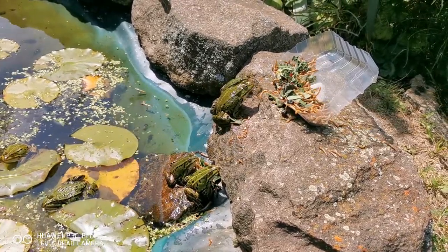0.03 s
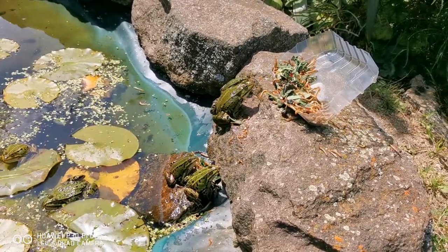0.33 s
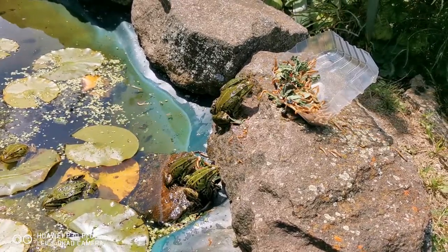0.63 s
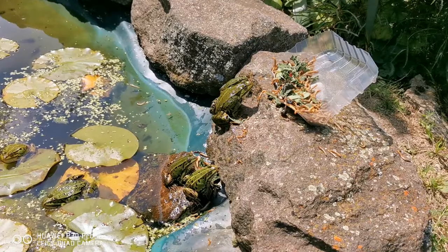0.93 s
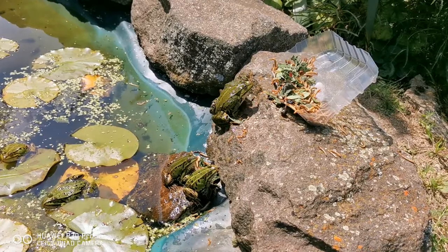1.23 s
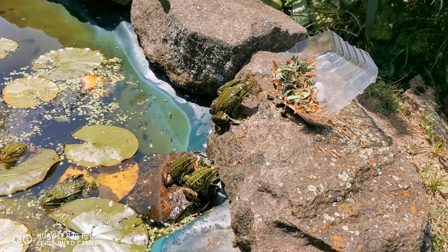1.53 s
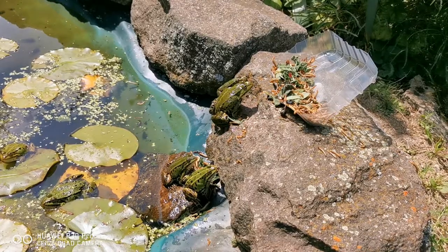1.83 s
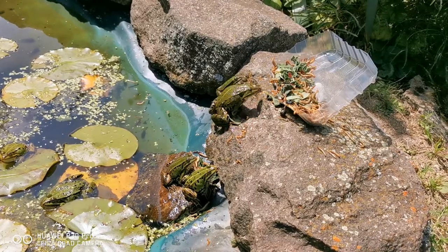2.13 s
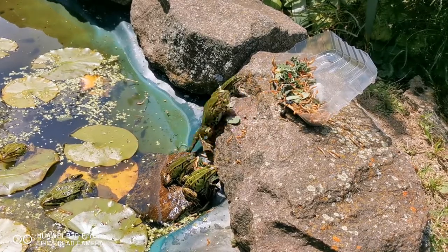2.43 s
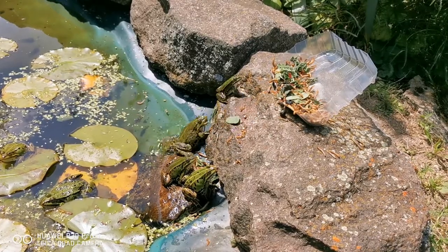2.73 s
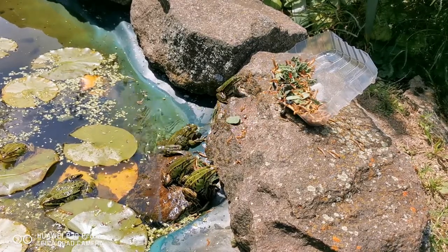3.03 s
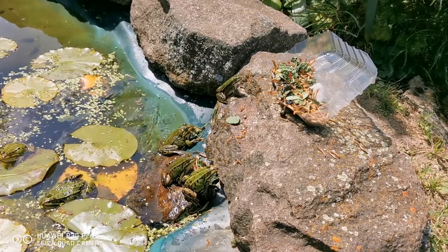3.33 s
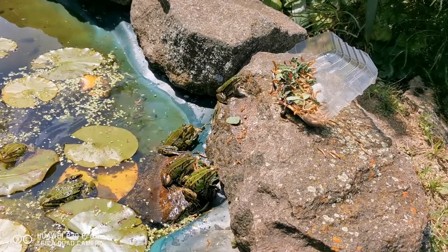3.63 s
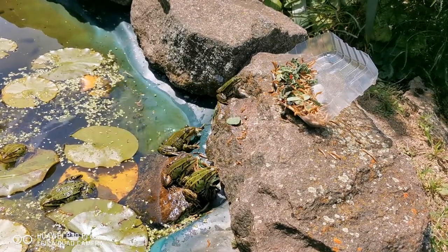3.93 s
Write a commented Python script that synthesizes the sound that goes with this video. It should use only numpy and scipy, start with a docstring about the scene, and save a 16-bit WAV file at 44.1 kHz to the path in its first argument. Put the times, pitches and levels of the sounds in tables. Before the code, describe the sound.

A frog makes a brief, bubbly splash in a garden pond, after a small plip and scattered wet clicks. Heard in stereo, the quiet background holds faint repeated bird chirps and a low hum like a far engine.

```python
"""A garden pond ringed by rocks, heard on a stereo pair. A frog hops off a rock and slips in: a few
wet ticks, then a short splash of fine spray and small ringing bubbles, with a brief echo off the rocks.
Some way off a bird repeats one falling chirp, and farther birds add thin notes. Underneath lie
soft garden air, a faint insect hiss and a low hum, like a far engine, that swells and fades."""
import sys
import numpy as np
from scipy import signal
from scipy.fft import rfft, irfft
from scipy.io import wavfile
from scipy.ndimage import uniform_filter1d, map_coordinates

SR = 44100
rng = np.random.default_rng(int(sys.argv[2]) if len(sys.argv) > 2 else 0)


def unload_audio(sound):
    """Save the sound as a 16-bit wav file, at the path given as the first command line argument."""
    columns = np.transpose(np.atleast_2d(sound))
    # keep every value between -1 and 1, then stretch to whole-number steps
    steps = np.round(np.clip(columns, -1, 1) * 32767)
    wavfile.write(sys.argv[1], SR, steps.astype(np.int16))


N = 176400

# pitch of the far hum (time [s], pitch [Hz])
HUM_PITCH = [(0, 58.6), (.55, 58.8), (1.1, 55.9), (1.35, 58.73), (1.55, 56.5), (2.0, 57.93), (2.3, 57.95),
             (2.6, 56.1), (3.0, 57.86), (4, 57.5)]
# its first three partials and the drone above them (time [s], level [dB])
HUM_FIRST = [(0.0, -58.5), (0.22, -57), (0.29, -67.5), (0.43, -45.5), (0.61, -45), (0.73, -56),
             (0.87, -50.5), (1.29, -51.5), (1.36, -59.5), (1.7, -43.5), (1.82, -52.5), (1.95, -43),
             (2.04, -45.5), (2.08, -56.5), (2.34, -46.5), (2.43, -65), (2.47, -51), (2.58, -44.5),
             (3.07, -48.5), (3.13, -64), (3.4, -56.5), (3.46, -67), (3.55, -58), (3.85, -65), (3.91, -52),
             (4.0, -51)]
HUM_SECOND = [(0.0, -64), (0.27, -65), (0.33, -80), (0.39, -56.5), (0.62, -58), (0.73, -67), (0.81, -56),
              (0.96, -72.5), (0.99, -56), (1.16, -74), (1.27, -54), (1.31, -66), (1.45, -57), (1.56, -70),
              (1.6, -61), (1.89, -59.5), (1.95, -50), (2.14, -75), (2.21, -63.5), (2.51, -59), (2.53, -67),
              (2.67, -54.5), (3.85, -76), (4.0, -62)]
HUM_THIRD = [(0, -72), (.22, -62.5), (.35, -77.5), (1.3, -75), (2.1, -76.5), (3, -78.5), (4, -86)]
HUM_DRONE = [(0, -76), (.85, -77.5), (1.2, -67.5), (1.8, -67.5), (2.0, -91.5), (4, -77)]
# colour of the garden air (frequency [Hz], relative density [dB])
AIR_SPECTRUM = [(15, -26), (25, -7.5), (44, -6.5), (66, -1), (82, -11.5), (102, -7.5), (236, -17.5),
                (384, -27), (575, -23.5), (754, -23.5), (1440, -34.5), (2220, -34), (3520, -40),
                (8830, -51), (9840, -50), (10700, -46.5), (16000, -52)]
# its stereo width (frequency [Hz], side over mid [dB])
AIR_SIDE = [(40, -15), (125, -14), (250, -11), (500, -4.5), (1000, 4), (3000, 0), (12000, 0.5)]
# its balance (frequency [Hz], left over right [dB])
AIR_PAN = [(40, 1.5), (250, -1.5), (500, -6), (1000, -3.5), (4000, -1), (12000, -7.5)]
# slow swells of its lower octaves and of its treble (time [s], gain [dB])
AIR_SWELL = [(0, 0.5), (.6, 0.5), (1.3, 2), (2.0, 1.5), (2.7, -0.5), (3.3, -1.5), (4, -2)]
AIR_TREBLE_SWELL = [(0, -1.5), (1.8, 0.5), (2.4, 2), (3.3, 0.5), (4, 0)]
# insect hiss (time [s], level [dB])
INSECT_LEVEL = [(0, -87), (1.75, -89), (1.95, -82), (2.9, -79.5), (3.55, -79.5), (3.63, -98), (4, -82)]
# its resonances (centre [Hz], width [Hz], relative level [dB])
INSECT_BANDS = [(7180, 1300, -1.5), (7920, 1300, 0.67), (8670, 860, -2.5)]
# the bird some way off
# (time [s], length [s], relative level [dB], pitch [ratio], gain at the end [dB], warble [0-1])
CHIRPS = [(0.025, 0.11, -67, .99, 1.5, 1), (0.661, 0.099, -69, .9, 4.5, 0), (1.245, 0.092, -62, 1.01, 3, 0),
          (1.840, 0.12, -61, 1.0, -1, 1), (2.515, .11, -64, 0.94, -2.5, .3),
          (3.123, 0.099, -71.5, 0.89, 5, 0.16), (3.656, 0.1, -64.5, 1.003, 1.5, .2)]
# course of one chirp (share of length [0-1], stepped pitch [Hz], warbled pitch [Hz], gain [dB])
CHIRP_SHAPE = [(0, 3874, 3764, -8), (.13, 4850, 4573, -2.5), (0.331, 4050, 4740, -0.5),
               (.42, 3870, 3717, 0.5), (.57, 3980, 3658, -5), (0.711, 3010, 4336, 0.5),
               (.87, 2984, 3035, 2), (1, 2630, 2564, -2.5)]
# farther birds (time [s], length [s], relative level [dB], pitch [Hz])
FAR_NOTES = [(1.029, 0.055, -71.5, 4150), (1.96, 0.11, -75, 5200), (2.264, 0.024, -67.5, 2790),
             (2.271, 0.098, -74, 4300), (3.738, 0.088, -77, 9190)]
# wet feet and spray landing (time [s], relative peak [dB], centre [Hz], width [Hz], left over right [dB])
WET_TICKS = [(0.0377, -56, 9000, 9000, 1), (0.112, -60.5, 6000, 6000, -6), (.171, -60, 9000, 9000, -7),
             (.7145, -56, 7990, 8000, -9), (.951, -59, 7020, 5000, 2), (1.0877, -61.5, 8330, 3000, 5),
             (1.108, -63, 9300, 3000, 6), (1.2792, -47.5, 7480, 7080, -8), (2.133, -56.5, 9500, 6000, 4),
             (2.353, -63, 13000, 7000, -10), (2.436, -58, 11500, 5000, -6), (2.5917, -52, 606, 1004, 6),
             (2.591, -49.5, 2200, 2790, -2), (2.8071, -55.5, 1500, 1600, -2), (2.593, -49, 9200, 900, -2),
             (2.593, -48, 13000, 2500, -5), (2.608, -54, 13450, 1503, -6), (2.633, -54.5, 8890, 9000, -10),
             (2.6552, -54, 12000, 8000, -13), (2.660, -55, 12000, 8000, -4), (2.8379, -37, 10940, 2785, -2),
             (2.8573, -41.5, 9800, 4500, -2), (2.9472, -56, 8000, 12000, -1), (2.975, -60, 11490, 4000, 2),
             (3.413, -61.5, 5500, 2502, -4)]
# bubbles and drops at the surface
# (time [s], starting pitch [Hz], relative peak [dB], ring t60 [s], left over right [dB])
BUBBLES = [(.9812, 6860, -62, .008, 4), (0.9979, 2170, -46.5, 0.017, -6), (.9984, 8660, -50.5, 0.0048, 7),
           (0.998, 4740, -54.5, .005, 4), (2.8072, 1556, -56, 0.0045, 5), (2.8205, 5300, -59, 0.0051, -13),
           (2.8374, 9300, -36.5, 0.0055, 5), (2.8382, 7920, -35.5, 0.0038, -13.5),
           (2.8420, 9000, -55, 0.0072, 6), (2.8452, 10700, -49, .005, 0), (2.8480, 3740, -46, .014, 4),
           (2.848, 2870, -45.5, 0.0085, -11), (2.8564, 2352, -41.5, .024, -5),
           (2.8571, 3780, -59, 0.006, 6), (2.8628, 2720, -48, .025, 1), (2.9146, 3000, -53, 0.0077, -5),
           (2.92, 3900, -53, 0.0075, 11), (2.928, 4200, -60, 0.0078, 1), (2.924, 3680, -45, 0.0054, -13),
           (2.9245, 2520, -43, 0.0066, -4), (2.935, 3500, -57, 0.0091, -4), (2.946, 1210, -53, 0.019, 4)]
# fine spray, fizz and scuffing (time [s], length [s], level [dB], centre [Hz], width [Hz])
SPRAY = [(2.335, 0.082, -73.5, 13000, 8000), (2.623, 0.076, -71, 12000, 8000),
         (2.833, 0.019, -66, 9500, 2600), (2.849, 0.02, -59.5, 3120, 1300), (2.862, 0.039, -72, 9400, 4000),
         (2.922, 0.017, -66, 3650, 1500)]


def undb(db):
    """Decibels to gain."""
    return 10 ** (np.asarray(db) / 20)


def unit(x):
    """Scale to rms 1."""
    return x / np.sqrt(np.mean(x ** 2) + 1e-30)


def curve(rows):
    """Join (time [s], value) rows by straight lines."""
    return np.interp(np.arange(N) / SR, *np.array(rows, float).T)


def at_hz(rows, hz):
    """Read (frequency [Hz], value) rows on a log-frequency axis."""
    freqs, values = np.array(rows, float).T
    return np.interp(np.log(np.maximum(hz, 1)), np.log(freqs), values)


def pan(db):
    """Channel gains that put the left db above the right."""
    return undb(np.array([[db], [-db]]) / 2)


def band(x, hz, width):
    """A resonance applied twice, each pass widened so that the pair is about width Hz wide."""
    hz = min(hz, SR * .45)
    b, a = signal.iirpeak(hz, hz / min(width * 1.5, SR * .35), fs=SR)
    return signal.lfilter(b, a, signal.lfilter(b, a, x))


def walk(per_s, size=N):
    """Smooth random wander with spread near 1."""
    hold = max(int(SR / per_s), 1)
    steps = np.repeat(rng.standard_normal(size // hold + 2), hold)
    return np.sqrt(2) * uniform_filter1d(uniform_filter1d(steps, hold), hold)[:size]


def add(out, start, sound):
    """Mix a sound in at its time."""
    i = max(int(start * SR), 0)
    out[..., i:i + sound.shape[-1]] += sound[..., :N - i]


def echo(x, t60):
    """Diffuse reflections, unrelated at the two microphones."""
    t = np.arange(SR // 2) / SR
    tail = rng.standard_normal((2, len(t))) * np.exp(-np.log(1000) * t / t60) * (1 - np.exp(-t / .001))
    tail /= np.sqrt(np.sum(tail ** 2, axis=1, keepdims=True))
    return signal.fftconvolve(x, tail, axes=1)[:, :N]


def far_hum(drone_hz=239.8, waver_db=1.33):
    """A hum like a far engine: three partials swell and waver separately under a faint drone."""
    phase = 2 * np.pi * np.cumsum(curve(HUM_PITCH)) / SR
    drone_phase = 2 * np.pi * drone_hz * np.arange(N) / SR
    first = np.sin(phase + .083 * walk(13)) * undb(curve(HUM_FIRST) + .5 * walk(25))
    second = np.sin(2 * phase + .97 * walk(14)) * undb(curve(HUM_SECOND) + waver_db * walk(16))
    third = np.sin(3 * phase + 1.4 * walk(14)) * undb(curve(HUM_THIRD) + waver_db * walk(15))
    drone = np.sin(drone_phase + .5 * walk(12)) * undb(curve(HUM_DRONE) + waver_db * walk(14))
    return np.sqrt(2) * (first + second + third + drone) * pan(2.1)


def garden_air(base_db=-60.5, treble_from_hz=4500):
    """Soft outdoor noise, wide in the middle and treble, each octave wandering a little."""
    hz = np.arange(N // 2 + 1) * SR / N
    mid, side = rfft(rng.standard_normal((2, N)))
    sign = np.array([[1], [-1]])
    stereo = mid + sign * side * undb(at_hz(AIR_SIDE, hz))
    spectrum = stereo * undb(at_hz(AIR_SPECTRUM, hz) + sign * at_hz(AIR_PAN, hz) / 2)
    octave = np.log2(np.maximum(hz, 20) / 20)
    out = np.zeros((2, N))
    for k in range(11):
        octave_noise = irfft(spectrum * np.maximum(1 - np.abs(octave - k), 0), N)
        swell_db = curve(AIR_TREBLE_SWELL if 20 * 2 ** k > treble_from_hz else AIR_SWELL)
        out += octave_noise * undb(swell_db + walk(9.08))
    return out / np.std(irfft(spectrum, N)) * undb(base_db)


def insect(flicker_db=2.1):
    """A faint, flickering hiss: noise through three high resonances."""
    noise = rng.standard_normal((2, N))
    hiss = sum(undb(db) * band(noise, hz, width) for hz, width, db in INSECT_BANDS)
    return unit(hiss) * undb(curve(INSECT_LEVEL) + flicker_db * walk(60))


def bird(waver=.032, upper_ratio=1.22, upper_db=-11):
    """Some way off, a two-voiced chirp arches, then steps or warbles down."""
    out, t = np.zeros(N), np.arange(SR // 5) / SR
    share, stepped, warbled, shape_db = np.array(CHIRP_SHAPE).T
    for start, length, db, ratio, end_db, warble in CHIRPS:
        progress = t / length
        hz = ratio * np.interp(progress, share, stepped + warble * (warbled - stepped))
        hz *= 1 + waver * walk(400, len(t))
        phase = 2 * np.pi * np.cumsum(hz) / SR
        level_db = db + np.interp(progress, share, shape_db) + end_db * np.clip(2 * progress - .5, 0, 1)
        fade = np.clip(20 * np.minimum(progress, 1 - progress), 0, 1)
        upper_gain = undb(upper_db) * np.clip((4400 - hz) / 300, 0, 1)  # enters below 4400 Hz
        voices = np.sin(phase) + upper_gain * np.sin(upper_ratio * phase)
        add(out, start, np.sqrt(2) * undb(level_db) * fade * voices)
    return out


def far_birds(waver=.028):
    """Farther off, thin notes: each a single wavering tone that swells and fades."""
    out, t = np.zeros(N), np.arange(SR // 5) / SR
    for start, length, db, hz in FAR_NOTES:
        phase = 2 * np.pi * np.cumsum(hz * (1 + waver * walk(400, len(t)))) / SR
        arch = np.sin(np.pi * np.minimum(t / length, 1))
        add(out, start, undb(db) * arch * np.sin(phase))
    return out


def wet_ticks(decay_s=.00062, gain_db=.5):
    """Tiny contacts of wet feet and spray: each a burst of noise about a millisecond long."""
    out, t = np.zeros((2, N)), np.arange(SR // 50) / SR
    for start, db, hz, width, pan_db in WET_TICKS:
        tick = band(rng.standard_normal(len(t)) * np.exp(-t / decay_s), hz, width)
        add(out, start, tick / np.abs(tick).max() * undb(db + gain_db) * pan(pan_db))
    return out


def bubbles(rise=.04, attack_s=.0003, gain_db=-2.5):
    """At the surface, each bubble rings as a damped sine that rises a little in pitch."""
    out, t = np.zeros((2, N)), np.arange(SR // 20) / SR
    for start, hz, db, t60, pan_db in BUBBLES:
        phase = 2 * np.pi * np.cumsum(hz * (1 + rise * np.minimum(t / t60, 1))) / SR
        attack = 1 - np.exp(-(t / attack_s) ** 2)
        ring = np.sin(phase) * attack * np.exp(-np.log(1000) * t / t60)
        add(out, start, ring / np.abs(ring).max() * undb(db + gain_db) * pan(pan_db))
    return out


def spray(grain_db=3):
    """Midway between the microphones, dense specks of uneven size swell quickly and die away."""
    out, t = np.zeros((2, N)), np.arange(SR // 4) / SR
    for start, length, db, hz, width in SPRAY:
        specks = rng.standard_normal(len(t)) * undb(grain_db * walk(760, len(t)))
        envelope = (1 - np.exp(-t / (.1 * length))) * np.exp(-(t / length) ** 2)
        add(out, start, unit(band(specks, hz, width)) * envelope * undb(db))
    return out


def scene(left_lag_s=.000016):
    """The frog among the rocks, reaching the left microphone a little late, and the garden around it."""
    left, right = bubbles() + wet_ticks() + spray()
    late_left = map_coordinates(left, [np.arange(N) - left_lag_s * SR], order=3)
    frog = np.array([late_left, right])
    rock_echo = undb(-7) * echo(frog, t60=.12)
    song = bird() + far_birds()
    garden_echo = undb(-.27) * echo(song[None], t60=.45)
    birds = (undb(-7) * song + garden_echo) * pan(-2.5)  # more echo than direct sound at this distance
    return frog + rock_echo + birds + far_hum() + garden_air() + insect()


def record(dry, top_hz=15850):
    """The recorder cuts the top with a steep low-pass."""
    return signal.sosfilt(signal.ellip(10, .2, 70, top_hz, fs=SR, output="sos"), dry)


dry = scene()
out = record(dry)
unload_audio(out)
```